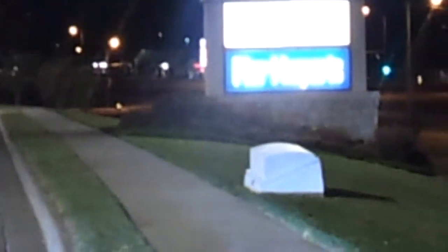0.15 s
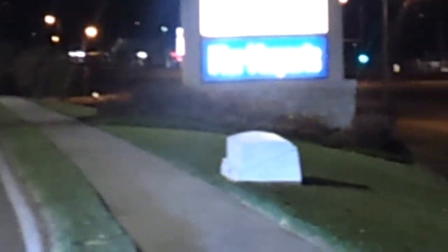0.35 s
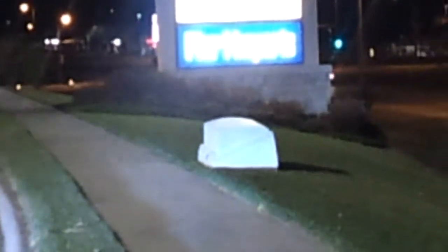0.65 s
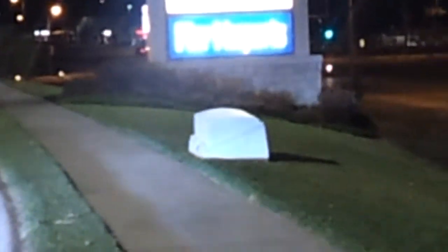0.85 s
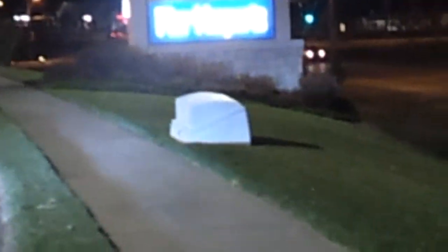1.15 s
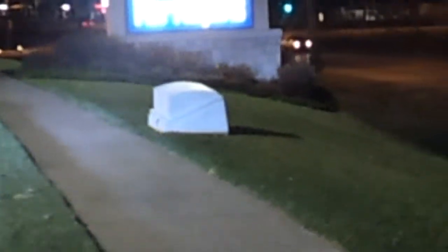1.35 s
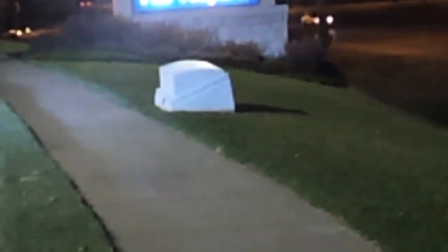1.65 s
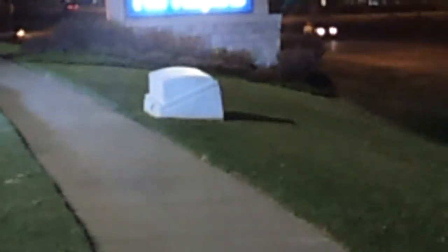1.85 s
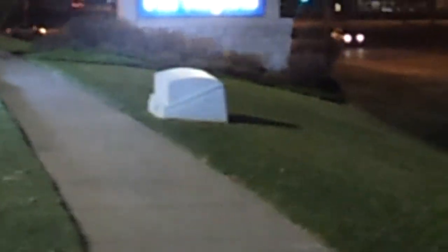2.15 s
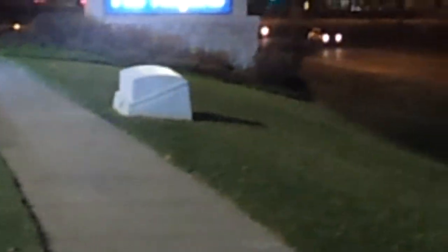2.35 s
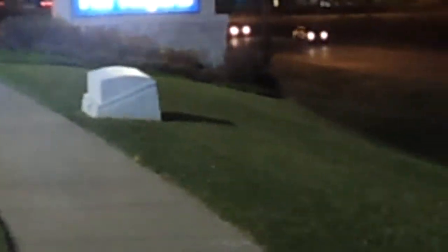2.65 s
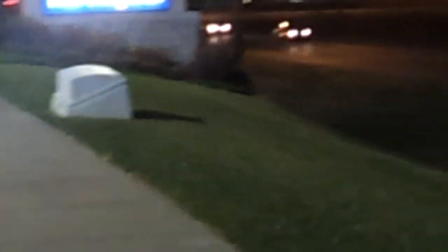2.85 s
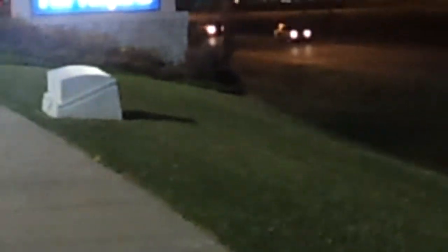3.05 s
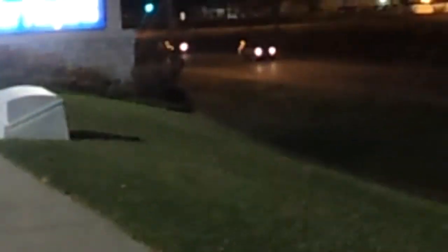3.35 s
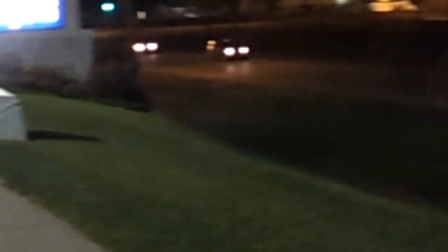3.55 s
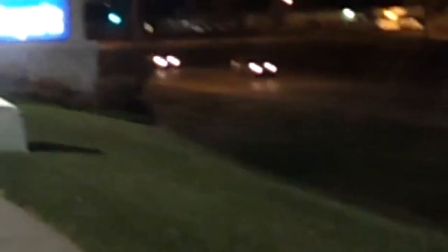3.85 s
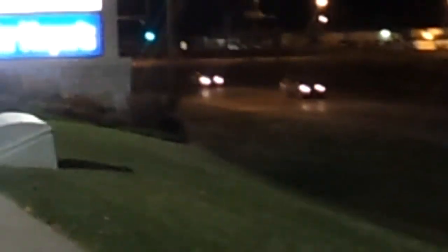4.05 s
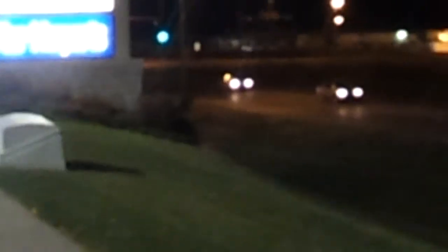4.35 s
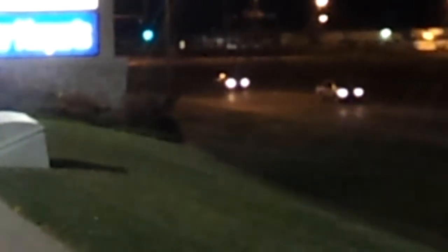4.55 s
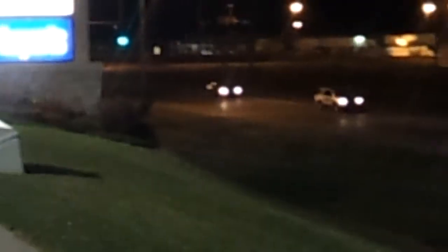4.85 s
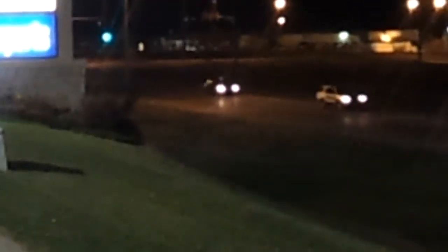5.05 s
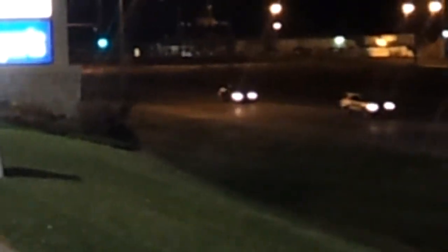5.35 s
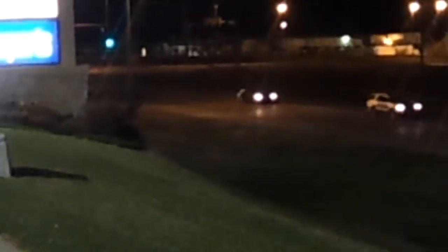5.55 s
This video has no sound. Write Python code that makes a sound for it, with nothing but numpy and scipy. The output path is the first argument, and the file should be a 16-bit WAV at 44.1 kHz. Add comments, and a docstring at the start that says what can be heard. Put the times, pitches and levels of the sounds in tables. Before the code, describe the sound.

A mono outdoor recording on a grassy verge by a road at night. From 0 to about 1.1 s, wind hits the microphone with low, lumpy rumbles, hard thumps and flips, the loudest peaks flattened by overload; afterwards only faint gusts remain. Throughout, a big eight-cylinder engine rolls by slowly near 1200 rpm, a deep, uneven, throbbing burble with slight hunting in speed, closest around 2.3 s. A soft band of tyre roar is fullest near 1.5-2 s and fades after 3 s, while farther traffic rises gently around 3.8 s. Dry stalks crunch and snap close by, with small ticks at 0.7, 0.95 and 1.5 s, a crisp cluster at 2.4-2.75 s and another at 3.6 s. Crickets trill near 5 kHz, with slower pulses near 6 kHz and a faint high buzz around 0.7-2 s. From about 4.75 s the engine slows and its pitch sinks until the cut at 5.7 s.

```python
"""A roadside verge at night: a big eight-cylinder engine rolls slowly past near 1200 rpm, then slows.
Its burble is a stack of sines, roughened by random clicks ringing in two exhaust pipes.
Gusts, mostly early on, buffet the microphone as low noise, single eddies and bumps.
Dry stalks crunch and snap close by: clumps of clicks and short rings.
Crickets trill in pulsed sines, and tyres and far traffic roar in shaped bands of noise."""
import sys
import numpy as np
from scipy import signal
from scipy.io import wavfile

SR = 44100
rng = np.random.default_rng(int(sys.argv[2]) if len(sys.argv) > 2 else 0)


def pcm_store(signal):
    """Save signal as 16-bit PCM."""
    levels = np.round(np.clip(np.atleast_2d(signal), -1, 1) * 32767)
    wavfile.write(sys.argv[1], SR, levels.astype(np.int16).T)


def boost_factor(decibels):
    """Convert a level in decibels to a linear amplitude factor."""
    exponent = np.asarray(decibels, float) / 20
    return 10 ** exponent


N = 251370
TIME = np.arange(N) / SR
TINY = 1e-18   # inaudible offset that keeps the filters' inputs from being exactly zero


def rms_one(x):
    """Scale to an rms of 1."""
    return x / np.sqrt(np.mean(x ** 2) + 1e-20)


def in_time(rows):
    """Join the rows of a table by straight lines in time; the first column is start_s."""
    start_s, *columns = np.transpose(rows)
    return [np.interp(TIME, start_s, column) for column in columns]


def across(curves, centres_hz, hz):
    """Blend time curves given at a few frequencies to find the one at hz."""
    place = np.interp(np.log(hz), np.log(centres_hz), np.arange(len(curves)))
    k = min(int(place), len(curves) - 2)
    return curves[k] + (place - k) * (curves[k + 1] - curves[k])


def drift(rate_hz):
    """Slow random wandering with an rms of 1, made at a fortieth of the sample rate."""
    r = np.exp(-80 * np.pi * rate_hz / SR)
    noise = rng.standard_normal(N // 40 + 2002)
    slow = signal.lfilter([1], [1, -2 * r, r * r], noise)[2000:]   # skip the filter's start
    return np.interp(np.arange(N) / 40, np.arange(len(slow)), rms_one(slow))


def band(x, low_hz, high_hz, order=2):
    """Keep one band of frequencies (Butterworth)."""
    edges_hz = [low_hz, min(high_hz, .45 * SR)]
    return signal.sosfilt(signal.butter(order, edges_hz, "band", fs=SR, output="sos"), x)


def ring(hz, t60_s):
    """Filter in which a unit click starts a sine of height 1 that dies by 60 dB in t60_s."""
    r, w = boost_factor(-60 / (t60_s * SR)), 2 * np.pi * hz / SR
    return [0, np.sin(w)], [1, -2 * r * np.cos(w), r * r]


CLOSEST_S, REACH_S = 2.336, 0.52   # moment of closest approach, time to cover the closest distance


def distance_db(early_s):
    """Spreading loss of a straight pass, 0 dB when the sounding part of the car is closest."""
    return -10 * np.log10(1 + ((TIME - CLOSEST_S + early_s) / REACH_S) ** 2)


# firing order over two turns of the crank: angle_deg, bank (0 or 1), strength_db
FIRINGS = [(56.1, 1, 2.1), (155.6, 0, -1.3), (238.8, 0, 2.4), (327.3, 1, 0.9), (418.8, 0, 0.3),
           (507.3, 1, 2.2), (601.3, 1, -0.3), (690.2, 0, 1.0)]
# resonances of each bank's exhaust pipe: pitch_hz, level_db (relative), t60_s, sign
PIPES = [[(57.1, -3.0, 0.171, -1), (62.4, -12.6, 0.147, 1), (122.5, -12.2, 0.171, -1),
          (157.5, -9.9, 0.028, -1), (232.6, -16.9, 0.058, 1), (400.1, -25.7, 0.016, -1)], [(50.2, -2.7, 0.056, -1), (90.9, -13.2, 0.133, 1), (111.3, -11.8, 0.171, -1),
                          (198.8, -4.7, 0.142, 1), (201.1, -5.7, 0.171, -1), (297.3, -19.0, 0.047, -1)]]
# steady exhaust note: order (multiple of the firing-cycle rate), level_db (relative)
NOTE_ORDERS = [(2, -27), (4, -19), (5, 1.5), (6, -24), (7, -16), (8, -0.5), (9, -15), (10, -20.5),
               (11, -10.5), (12, -10), (13, -11.5), (14, -24), (15, -32), (16, -3), (17, -16.5),
               (18, -17.5), (19, -15), (20, -9), (21, -19), (22, -18), (23, -26), (24, -18.5), (25, -30),
               (26, -25.5), (27, -20), (28, -35), (29, -16), (30, -28), (31, -20), (32, -17), (33, -26),
               (34, -30), (35, -22), (36, -30), (37, -16), (38, -34), (39, -25), (40, -23), (41, -33),
               (42, -30), (43, -26)]
# how each region of the note follows the pass: pitch_hz, level_db (before the other columns),
# early_s, distance_share (of the loss in dB), rear_db (gained from behind), lift_db_per_s (after lift-off)
REGIONS = [(50.6, .5, 0.15, 1, -1, 1.5), (78, 0, -0.2, 0.74, -3, -2), (116, 1.5, -0.091, 0.74, 1.5, -1),
           (165, 0, 0.43, 0.61, 8.5, -5.5), (214, 0.5, -0.37, 1, 2, 1.5), (237, 4.5, -0.047, 1, -9.5, 11),
           (270, 1.5, -0.1, 1, 7, -7), (358, 0.26, 0.1, 1, 10.5, -7)]


def exhaust_note(cycle, gains_db, waver_db):
    """Sines at orders of the firing cycle; the firing pattern through both pipes sets their phases."""
    orders, levels_db = np.transpose(NOTE_ORDERS)
    orders_hz = 10 * orders   # one firing cycle takes two turns: 10 per second at 1200 rpm
    response = 0
    for bank, pipe in enumerate(PIPES):
        firing = sum(boost_factor(db) * np.exp(-1j * np.pi * orders * deg / 360)
                     for deg, b, db in FIRINGS if b == bank)
        rings = sum(sign * boost_factor(db) * signal.freqz(*ring(hz, t60_s), orders_hz, fs=SR)[1]
                    for hz, db, t60_s, sign in pipe)
        response = response + firing * rings
    centres_hz = [row[0] for row in REGIONS]
    out = np.zeros(N)
    for order, level_db, phase in zip(orders, levels_db, np.angle(response)):
        region_db = across(gains_db, centres_hz, 10 * order)
        gain = boost_factor(-15 + level_db + region_db + waver_db * drift(0.54))
        out += np.sqrt(2) * gain * np.cos(2 * np.pi * order * cycle + phase)
    return out


def uneven_firing(cycle, gain_db, puff_db):
    """No two firings are alike: each one's chance surplus rings in its pipe, with a puff of gas noise."""
    out, gate = np.zeros(N), np.full(N, TINY)
    cycle_numbers = np.arange(int(cycle[-1]))
    for bank, pipe in enumerate(PIPES):
        clicks = np.full(N, TINY)
        for deg, b, db in FIRINGS:
            if b == bank:
                at = np.searchsorted(cycle, cycle_numbers + deg / 720)
                clicks[at] = rng.standard_normal(len(at))
                gate[at] = boost_factor(db + rng.normal(0, 0.57, len(at)))
        for hz, db, t60_s, sign in pipe:
            out += sign * boost_factor(db) * signal.lfilter(*ring(hz, t60_s), clicks)
    decay_s = 0.0028
    puff_shape = signal.lfilter([1], [1, -np.exp(-1 / (decay_s * SR))], gate)
    puffs = band(puff_shape * rng.standard_normal(N), 205, 404, order=3)
    return boost_factor(gain_db) * rms_one(out) + boost_factor(puff_db) * rms_one(puffs)


# crank speed, hunting up and down, then sinking as the driver lifts off: start_s, speed_rpm
CRANK_SPEED = [(0.0, 1163.8), (0.514, 1196.8), (0.801, 1183.9), (0.973, 1212.0), (1.305, 1214.0),
               (1.619, 1197.8), (1.967, 1225.5), (2.286, 1190.5), (2.562, 1208.8), (3.007, 1184.0),
               (3.384, 1206.1), (3.704, 1186.0), (4.083, 1221.4), (4.404, 1192.2), (4.75, 1221.5),
               (5.449, 1115.6), (5.7, 1055.5)]


def engine():
    """Steady note plus roughness; distance, the turning tail and the lift-off set each region's level."""
    turn_s, lift_s, start_deg = 3.86, 4.24, -19   # tail swings round, driver lifts off, first crank angle
    rpm, = in_time(CRANK_SPEED)
    cycle = np.cumsum(rpm) / 120 / SR + start_deg / 720   # firing cycles, of two turns each
    behind = np.tanh((TIME - CLOSEST_S) / turn_s)
    lifted_s = np.maximum(TIME - lift_s, 0)
    gains_db = [db + share * distance_db(early_s) + rear_db * behind + lift_db * lifted_s
                for _, db, early_s, share, rear_db, lift_db in REGIONS]
    rough = uneven_firing(cycle, gains_db[3] - 37, gains_db[4] - 43)
    return exhaust_note(cycle, gains_db, waver_db=.6) + rough


# gusts on top of the breeze: peak_s, low_db, upper_db, slope_s (time per 10 dB of rise or fall)
GUST_TIMES = [(0.0, -7, -17.5, 0.026), (.144, -16, -36, 0.015), (.21, -17, -28, 0.1),
              (.268, -17, -26.5, .03), (.34, -15.5, -43, 0.054), (.516, -14, -48, 0.026),
              (.642, -21, -29.5, 0.029), (.746, -11.5, -32, 0.02), (.86, -30, -50, 0.036),
              (.998, -18.5, -28, 0.081), (1.09, -28, -57, .03), (2.33, -30, -55, 0.058),
              (3.35, -21.5, -51, 0.1), (3.55, -34, -44, 0.067)]


def gusts():
    """Turbulence as lumpy noise in a low and an upper band: a breeze that drops away, and gusts."""
    breeze = boost_factor(-150 * np.maximum(TIME - 0.89, 0))   # falls 150 dB per s once it ends
    gains = [boost_factor(db) * breeze for db in (-27.5, -52)]
    for peak_s, low_db, upper_db, slope_s in GUST_TIMES:
        shape = boost_factor(-10 * np.abs(TIME - peak_s) / slope_s)
        gains = [np.hypot(gain, boost_factor(db) * shape) for gain, db in zip(gains, (low_db, upper_db))]
    low = rms_one(boost_factor(1.5 * drift(25)) * band(rng.standard_normal(N), 30, 150))
    upper = rms_one(boost_factor(1.5 * drift(40)) * band(rng.standard_normal(N), 170, 560))
    return gains[0] * low + gains[1] * upper


# single eddies: centre_s, peak_db, pitch_hz, length_cycles (centre to 1/e), sign
EDDY_TIMES = [(.002, -4.5, 170, 0.8, -1), (.043, -8, 90, 0.4, 1), (.058, -7, 127, .8, -1),
              (.15, -10, 200, .3, 1), (.252, -10, 326, 0.96, 1), (0.302, -6, 90, 0.27, -1),
              (.318, -8.5, 50, 0.26, 1), (.343, -10, 60, 0.47, 1), (.407, -12, 200, 0.37, 1),
              (0.634, -11, 90, .3, 1), (.745, -10, 100, 0.36, 1), (.757, -3.5, 90, 0.38, 1),
              (.821, -10, 70, 0.45, 1), (0.851, -10, 100, .3, -1), (.869, -7.5, 62, 0.82, -1),
              (.989, -11, 80, .4, -1), (1.009, -1, 234, 0.24, 1), (1.0131, -7, 110, 0.21, -1)]


def eddies():
    """Each eddy pushes the microphone's membrane back and forth in a brief, rounded wave."""
    out = np.zeros(N)
    for centre_s, db, hz, length_cycles, sign in EDDY_TIMES:
        turn = (TIME - centre_s) * hz
        out += np.sign(sign) * boost_factor(db) * np.exp(-(turn / length_cycles) ** 2) * np.cos(2 * np.pi * turn)
    return out


# bumps of the membrane: release_s, peak_db (before filtering), push_s, sign
BUMP_TIMES = [(0.0127, -5.5, 0.013, 1), (0.031, -3.5, 0.0034, 1), (.138, -15, .005, 1),
              (0.1714, -4.5, 0.0027, 1), (.209, -5, 0.0012, 1), (0.236, -10, .008, 1),
              (.311, -8.5, 0.0031, -1), (0.3259, -12, .004, -1), (.348, -0.5, 0.002, -1)]


def bumps():
    """The membrane is pushed slowly, then let go at once: it flips over and settles back."""
    out = np.full(N, TINY)
    for release_s, db, push_s, sign in BUMP_TIMES:
        since = TIME - release_s
        side = np.where(since < 0, 1, -1)
        out += np.sign(sign) * boost_factor(db) * side * np.exp(-np.abs(since) / push_s)
    low_pass = signal.butter(4, 560, fs=SR, output="sos")
    return signal.sosfilt(low_pass, band(out, 30, 900, order=1))


def wind():
    """Turbulence at the microphone: gusts of noise, eddies and bumps."""
    return gusts() + eddies() + bumps()


# crunches of dry stalks: start_s, length_s, level_db, centre_hz, width_octaves
CRUNCH_TIMES = [(0.687, 0.012, -35.5, 9500, 3.6), (0.947, 0.0072, -35, 4680, 0.33),
                (1.542, 0.02, -38.5, 3080, 0.37), (2.416, .02, -41, 3800, 0.36),
                (2.488, 0.039, -39, 3700, 0.5), (2.478, 0.041, -46, 7940, 0.29),
                (2.623, 0.088, -34.5, 2920, 1.4), (2.718, .012, -36, 2300, 0.41),
                (2.756, .012, -40, 2180, 0.42), (2.613, 0.15, -47, 8350, 0.28),
                (2.92, .006, -46, 8500, 0.36), (3.609, 0.037, -40.5, 2500, 0.79),
                (3.611, 0.02, -52, 9000, .7)]


def crunches():
    """Each crunch of dry stalks is a short clump of uneven clicks in a band."""
    out = np.zeros(N)
    is_click = rng.random(N) < 500 / SR   # about 500 per s
    click_heights = boost_factor(4.5 * rng.exponential(1, N).clip(0, 2.5))
    grains = rng.standard_normal(N) * (.3 + is_click * click_heights)
    for start_s, length_s, db, hz, octaves in CRUNCH_TIMES:
        progress = np.clip((TIME - start_s) / length_s, 0, 1)
        shape = np.sqrt(np.clip(np.sin(np.pi * progress ** 0.47), 0, 1))   # swells early
        clump = band(grains * shape + TINY, hz * 2 ** (-octaves / 2), hz * 2 ** (octaves / 2))
        out += boost_factor(db) * rms_one(clump) * np.sqrt(length_s * SR / N)   # level over its own length
    return out


# single stalks snapping: start_s, click_db, ring_hz, crack_db (relative to the click, before filtering)
SNAP_TIMES = [(2.4195, -30, 3930, -16), (2.472, -26, 3600, -16), (2.4831, -30, 3460, 0),
              (2.4953, -25, 3700, -6), (2.5061, -24, 3450, -6), (2.518, -17.5, 3660, -13),
              (2.523, -18, 3470, -16), (2.6328, -32, 3300, 2), (2.6399, -21, 3600, -10),
              (2.6724, -31, 3920, -12), (2.682, -29, 3540, 2), (3.614, -31, 3410, -10),
              (3.6215, -29, 3370, -13), (3.6255, -33, 3450, -8), (3.6364, -33, 3400, -16)]


def snaps():
    """Each snap is a click that rings briefly in the stalk, with a bright crack of noise."""
    out, cracks = np.zeros(N), np.full(N, TINY)
    for start_s, db, hz, crack_db in SNAP_TIMES:
        at = int(start_s * SR)
        click = np.zeros(N)
        click[at] = boost_factor(db)
        out += signal.lfilter(*ring(hz, t60_s=0.01), click + TINY)
        cracks[at:at + 40] += boost_factor(db + crack_db) * rng.standard_normal(40)
    return out + band(cracks, 5000, 9200)


# trilling crickets: start_s, end_s, pitch_hz, level_db (before the stroke shape), pulses_per_s
TRILL_TIMES = [(0.151, .55, 4930, -51, 45), (.68, .93, 4830, -51, 45), (0.954, 1.205, 5240, -42, 46.8),
               (1.024, 1.205, 4880, -44, 44.5), (1.208, 1.275, 4940, -40.5, 44.5),
               (1.48, 2.05, 4880, -52.5, 45), (2.35, 2.72, 5190, -49, 50), (3.08, 3.41, 4900, -48, 50),
               (3.197, 3.4, 5280, -55, 45), (3.39, 3.68, 4950, -49.5, 47), (3.68, 3.78, 4800, -53, 47),
               (3.92, 4.25, 4900, -52, 49), (4.08, 4.37, 4680, -52, 50), (4.21, 4.51, 5230, -52, 45),
               (4.5, 4.702, 4950, -56, 45), (4.68, 4.8, 4830, -54, 45), (4.76, 5.12, 4810, -51, 45),
               (4.84, 5.13, 4950, -54, 54), (5.12, 5.45, 4960, -49.5, 45), (5.4, 5.7, 4960, -53.5, 49),
               (5.35, 5.65, 5230, -52.5, 46), (5.3, 5.7, 4800, -54, 45)]


def trills():
    """Wing strokes: near-sine pulses whose pitch arches in each stroke and climbs as a trill starts."""
    stroke_arch_hz, warm_up_hz, warm_up_s = 100, 110, .06
    out, wavers = np.zeros(N), [drift(5.8), drift(88), drift(30)]
    for start_s, end_s, hz, db, per_s in TRILL_TIMES:
        on = slice(int(start_s * SR), min(int(end_s * SR), N))
        t = TIME[on]
        # each trill reads the wavers from a random place
        pace, pitch, level = (np.roll(waver, rng.integers(N))[on] for waver in wavers)
        # fainter singers are farther off: echoes fill the gaps between strokes and blur pitch and edges
        fill = np.clip(.5 + (-43.5 - db) / 5, .5, 1.5)
        edge_s = .004 + .045 * (fill - .5)
        swell = np.clip(np.minimum(t - start_s, end_s - t) / edge_s, 0, 1)
        wing = np.sin(2 * np.pi * np.cumsum(per_s + pace) / SR)
        arch_hz = stroke_arch_hz * (wing - .7) * (.5 / fill) ** 1.44
        climb_hz = -warm_up_hz * np.exp((start_s - t) / warm_up_s)
        strokes = np.maximum(wing + fill, 0) / (.6 + fill)
        tone = np.sin(2 * np.pi * np.cumsum(hz + arch_hz + climb_hz + 20 * fill * pitch) / SR)
        out[on] += boost_factor(db + 1.4 * level) * swell * strokes * tone
    return out


# two slower crickets, the second taking over from the first:
# start_s, first_db, second_db (both before a shared 2 dB lift)
SLOW_LEVELS = [(0, -62, -64), (.6, -57, -60), (1.5, -59, -59), (2.5, -58, -64), (3.1, -54, -66),
               (3.598, -51.5, -66), (4.2, -53, -60), (4.45, -55, -55), (4.8, -62, -52), (5.7, -75, -52)]


def slow_singers():
    """Two crickets with slow pulses, the pitch of the first rising and of the second arched."""
    pulses_per_s, top_hz = 17.22, 6090
    first_pulse_s, low_hz, half_turns = [.0315, .0067], [5840, 5650], [.5, 1.1]
    out = np.zeros(N)
    for first_s, low, turns, db in zip(first_pulse_s, low_hz, half_turns, in_time(SLOW_LEVELS)):
        stroke = np.minimum((TIME - first_s) * pulses_per_s % 1 / .6, 1)   # sounds for 60 % of each period
        pitch_hz = low + (top_hz - low) * np.sin(np.pi * turns * stroke) + 25 * drift(15)
        pulse = np.sqrt(np.abs(np.sin(np.pi * stroke)))
        tone = np.sin(2 * np.pi * np.cumsum(pitch_hz) / SR)
        out += boost_factor(db + 2.0 + 0.92 * drift(14)) * pulse * tone
    return out


def grass_echoes(x):
    """Scattered returns from grass and walls: 80 ms of dying noise, 6 dB down."""
    lags_s = np.arange(int(.08 * SR)) / SR
    returns = rms_one(rng.standard_normal(len(lags_s)) * boost_factor(-60 * lags_s / .1)) / np.sqrt(len(lags_s))
    return boost_factor(-6) * signal.fftconvolve(x, returns)[:N]


def insect_buzz():
    """A high band of noise that rises at 90 dB per s, holds, then fades at 16 dB per s."""
    full_s, fades_s = 0.69, 1.56
    buzz = rms_one(band(rng.standard_normal(N), 8800, 9900))
    rise_db = 90 * np.maximum(full_s - TIME, 0)
    fall_db = 16 * np.maximum(TIME - fades_s, 0)
    return boost_factor(-52 - rise_db - fall_db) * buzz


def far_chorus():
    """Many far crickets merged into a shimmer: a band of noise whose level wanders."""
    chorus = rms_one(band(rng.standard_normal(N), 4730, 5220))
    return boost_factor(-57.5 + 3.6 * drift(2)) * chorus


def crickets():
    """Trills and slow singers with faint echoes, a high buzz and the far chorus."""
    singers = trills() + slow_singers()
    return singers + grass_echoes(singers) + insect_buzz() + far_chorus()


# the passing car's own rumble: pitch_hz, level_db (per Hz, relative)
RUMBLE_SPECTRUM = [(25, 16), (32, 6), (40, 11), (65, 5), (100, 9), (140, 6), (220, 3), (350, -2.5),
                   (520, -7.5), (750, -31), (1500, -58)]
# tyres on the near lanes: pitch_hz, level_db (per Hz, relative)
TYRE_SPECTRUM = [(260, 0.5), (450, -4.5), (633, -5), (725, -2), (889, -1), (1200, -2.5), (1580, -8),
                 (2100, -8.5), (2870, -18), (3520, -16), (5450, -23), (6160, -20), (6770, -26.5),
                 (10600, -32), (11700, -39), (15200, -70), (22000, -120)]
# course of the near tyres: start_s, level_db, tilt_db (per octave about 1 kHz)
TYRE_COURSE = [(0, -61.5, 0), (.4, -59.5, -0.1), (.9, -58, 0.14), (1.4, -56.5, -1.4), (2.0, -56.5, -0.46),
               (2.5, -58.5, 0.5), (2.9, -58.5, -1.2), (3.4, -62.5, -1.05), (4.0, -72.5, 2), (5.7, -77.5, 3)]
# traffic at the crossing farther off: pitch_hz, level_db (per Hz, relative)
FAR_SPECTRUM = [(300, -39), (520, -14.5), (700, -3), (1050, 0), (1250, -9.5), (1550, -11), (1900, -25),
                (2400, -21), (3300, -27.5), (4200, -41), (6500, -44), (9000, -41), (11700, -44.5)]
# course of the far traffic: start_s, level_db, shift_octaves (of its spectrum)
FAR_COURSE = [(0, -63, 0.08), (2.0, -67.5, -0.0031), (2.8, -62, -0.13), (3.8, -56.5, -0.17),
              (4.5, -58, -0.089), (5.0, -57.5, -0.038), (5.7, -62, -0.0092)]
# narrow band of the roar cancelled by the echo off the ground: start_s, pitch_hz, depth_db
GROUND_ECHO_DIP = [(0, 3300, 11), (.8, 3300, 7), (1.2, 1650, 2.5), (1.6, 1620, 1), (3.1, 1500, 14),
                   (3.5, 1210, 5), (4.6, 1310, 9), (5.7, 1220, 3.5)]


def per_hz_db(spectrum, hz):
    """Level of a spectrum table at hz, by straight lines over log frequency."""
    table_hz, table_db = np.transpose(spectrum)
    return np.interp(np.log(hz), np.log(table_hz), table_db)


def traffic(patchy_db):
    """Sixth-octave noise bands; car rumble, near tyres and far traffic add in power and flicker a little."""
    near_db, tilt_db = in_time(TYRE_COURSE)
    far_db, shift_octaves = in_time(FAR_COURSE)
    dip_hz, dip_db = in_time(GROUND_ECHO_DIP)
    rumble_db = -54 + 0.68 * distance_db(0)   # takes only a share of the distance loss
    edges_hz = 25 * 2 ** (np.arange(55) / 6)
    white, out = rng.standard_normal((2, N)), 0   # neighbouring bands use different noise
    for k, (low, high) in enumerate(zip(edges_hz, edges_hz[1:])):
        hz = np.sqrt(low * high)
        parts_db = [rumble_db + per_hz_db(RUMBLE_SPECTRUM, hz),
                    near_db + per_hz_db(TYRE_SPECTRUM, hz) + tilt_db * np.log2(hz / 1000),
                    far_db + per_hz_db(FAR_SPECTRUM, hz / 2 ** shift_octaves)]
        roar = np.sqrt(sum(boost_factor(db) ** 2 for db in parts_db))
        lost_db = dip_db * np.exp(-(np.log2(hz / dip_hz) / 0.15) ** 2)   # dip width in octaves
        gain = roar * boost_factor(patchy_db * drift(6.3) - lost_db)
        out = out + gain * band(white[k % 2], low, high) * np.sqrt(SR / 2)   # noise of power 1 per Hz
    return out


def scene():
    """All sources at one microphone."""
    near = engine() + wind() + crunches() + snaps()
    return (near + crickets() + traffic(patchy_db=1.0))[None]


def band_limit(x):
    """A steep low-pass at the top of the band."""
    return signal.sosfilt(signal.butter(12, 11830, fs=SR, output="sos"), x)


def record(dry):
    """The input stage blocks the deepest bass; the highest peaks overload it, their tops cut flat."""
    overload = .705
    bass_cut = signal.butter(1, 12, "high", fs=SR, output="sos")
    mix = np.clip(signal.sosfilt(bass_cut, dry), -overload, overload)
    return band_limit(mix)


dry = scene()
out = record(dry)
pcm_store(out)
```